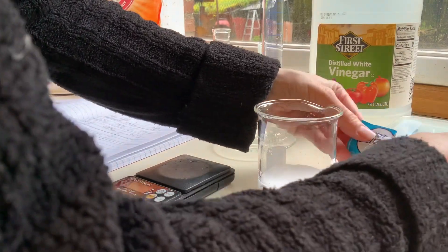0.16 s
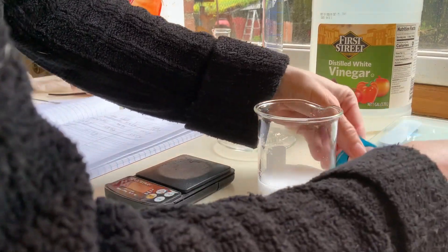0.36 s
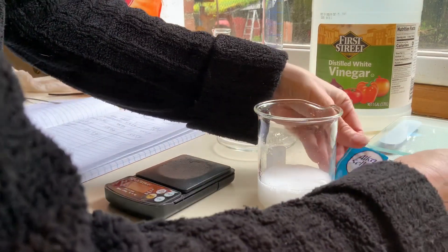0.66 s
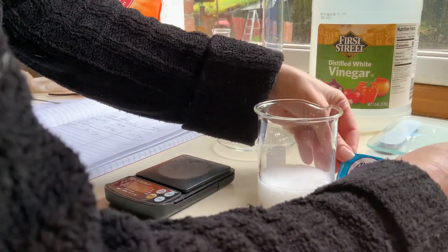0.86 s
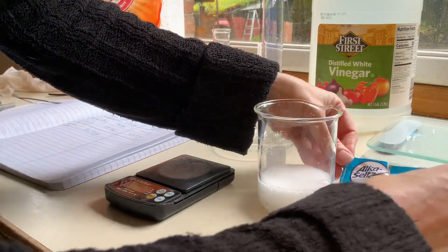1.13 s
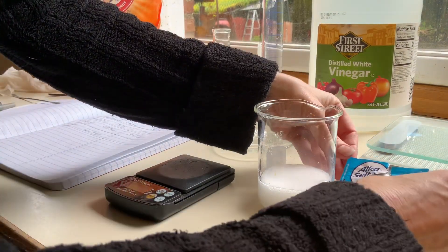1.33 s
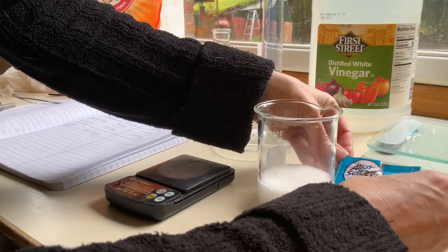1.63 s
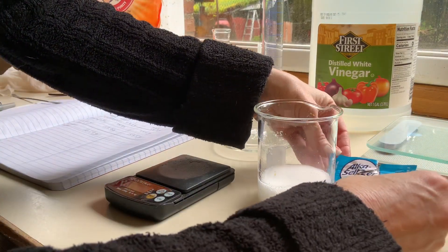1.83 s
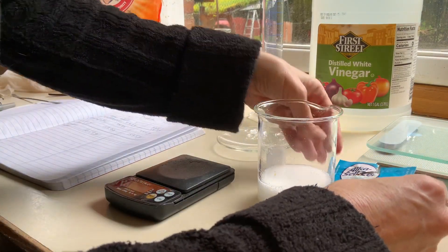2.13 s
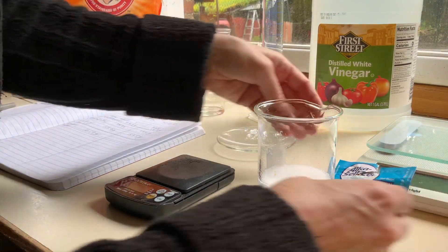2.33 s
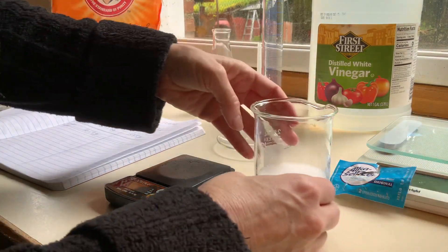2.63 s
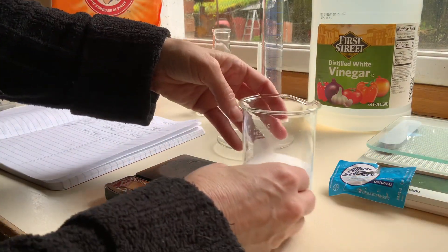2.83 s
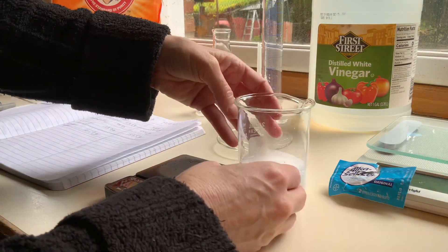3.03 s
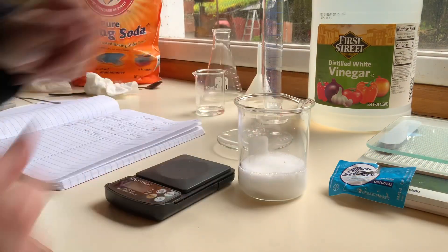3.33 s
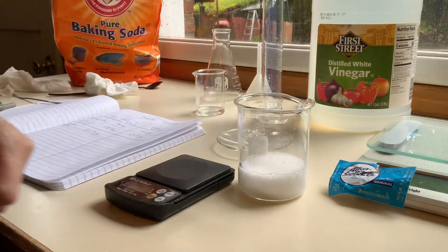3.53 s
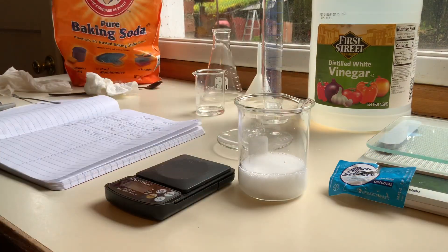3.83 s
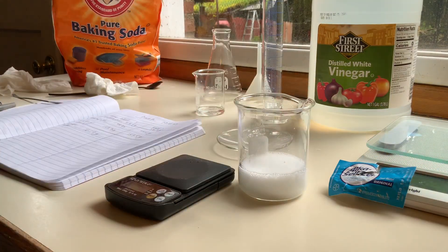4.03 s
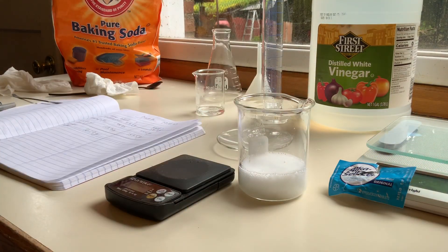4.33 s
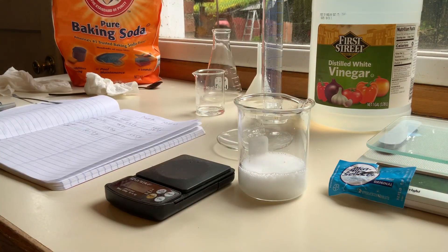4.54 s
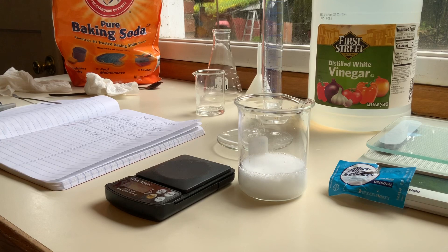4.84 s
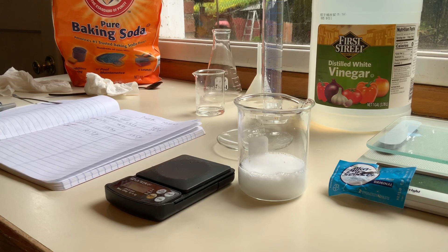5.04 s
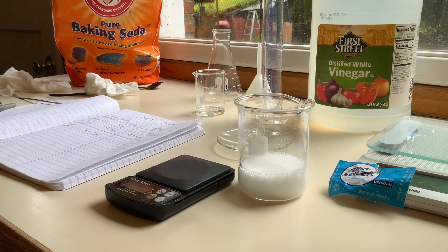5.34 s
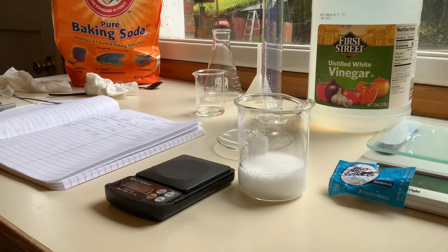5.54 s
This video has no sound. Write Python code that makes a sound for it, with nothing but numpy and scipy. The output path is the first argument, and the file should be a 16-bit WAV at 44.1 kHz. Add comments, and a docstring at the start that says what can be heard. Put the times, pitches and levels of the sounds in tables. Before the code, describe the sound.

Fine fizzing slowly fades over a low refrigerator hum, with foil crackles, a brief glass scrape on a worktop, then one sharp snap.

```python
"""In a quiet kitchen, something out of sight, probably a switch, snaps once: modes of a housing and a spring ring.
Before it a beaker of white liquid is slid a little way over the worktop: random slips make a dull scrape,
and catches ring the glass. A foil sachet crackles in bursts of resonant noise as it is laid down.
Throughout, random bubble bursts fizz finely and slowly die down, a refrigerator hums on lines of its motor
and the mains with wavering cabinet tones, and coloured noise makes a soft room rumble."""
import sys
import numpy as np
from scipy import signal
from scipy.fft import rfft, irfft
from scipy.io import wavfile

SR = 44100
rng = np.random.default_rng(int(sys.argv[2]) if len(sys.argv) > 2 else 0)


def log_audio(samples):
    """Write samples as a 16-bit WAV file to the path given in sys.argv[1]."""
    # one column per channel
    frames = np.atleast_2d(samples).T
    # limit to full scale, then quantise
    limited = np.clip(frames, -1, 1)
    pcm = np.round(limited * 32767).astype(np.int16)
    wavfile.write(sys.argv[1], SR, pcm)


N = 250929
TIME, FREQ = np.arange(N) / SR, np.fft.rfftfreq(N, 1 / SR)   # s, Hz
PORT_LAG_S = 0.00052   # delay of the right port

KNOCK_S = 4.4567   # the housing is struck once
# Modes of the hollow housing. Each row: frequency in Hz, level in dB before the body's band-pass,
# t60 in s, left-right difference in dB.
HOUSING_MODES = [(576, -25.5, 0.094, 19), (642, -17.5, 0.1, 5.5), (872, -24, 0.13, -2.5),
                 (910, -20, 0.031, 5), (1040, -28, 0.025, 4), (1550, -34, 0.044, 17), (2150, -49, 0.12, -4),
                 (2590, -41, 0.045, 4), (3300, -27.5, 0.039, -3)]
# Faint modes of the panel that carries the housing. Each row: frequency in Hz, level in dB, t60 in s,
# left-right difference in dB.
PANEL_MODES = [(205, -38.5, 0.22, 1), (343, -43, 0.26, -7), (575.7, -35.5, 0.46, 2), (635, -37, 0.34, 4),
               (1050, -37, 0.28, -7)]
# Modes of the spring. Each row: frequency in Hz, level in dB for a contact of 0 dB, t60 in s,
# left-right difference in dB.
SPRING_MODES = [(4296, -39, 0.045, 0), (4090, -32, 0.018, -1), (5830, -50, 0.09, -14),
                (6540, -43, 0.044, -14), (8565, -35, 0.07, 4), (12020, -53, 0.12, 0)]
# Contacts of the chattering spring. Each row: start in seconds, level in dB relative to the modes and ticks,
# highest pitch that the contact excites in Hz.
SPRING_CONTACTS = [(4.4563, 4.5, 4800), (4.4603, -2, 15000), (4.4659, -3, 12000), (4.4715, -6, 12000),
                   (4.4793, -13, 10000)]
# Spectra of the contact ticks, the rattling case, the merged spring overtones, the near reflections
# and the room's answer. Each row: frequency in Hz, relative density in dB per Hz.
TICK_SPECTRUM = [(2000, -20), (4000, 0), (9000, 0), (12000, -3), (16000, -6)]
RATTLE_SPECTRUM = [(700, -28), (1050, 5), (1500, 5), (2100, -1), (2700, -18), (3600, 3), (6000, -37)]
CLATTER_SPECTRUM = [(2500, -18), (4000, -5), (5000, 1), (6500, 0), (8000, -2), (10000, -32)]
SCATTER_SPECTRUM = [(100, 4), (200, 7.5), (400, 2), (600, 7), (1000, 3), (1600, 2), (2500, -12), (4200, -1),
                    (6000, -11), (9000, -6.5), (12000, -15.5), (16000, -32)]
ROOM_SPECTRUM = [(80, 3), (200, 9), (560, 2.5), (1000, 0.5), (1700, -10), (3000, -16), (8000, -34),
                 (15000, -52)]


def switch():
    """Modal excitation: a blow rings housing and panel, a spring chatters, the case rattles, reflections follow."""
    blow = [(KNOCK_S, 0, np.inf)]
    # a small housing radiates little bass, and the blow is slightly cushioned
    body = signal.butter(3, [450, 3600], "band", fs=SR, output="sos")
    knock = signal.sosfilt(body, struck(blow, HOUSING_MODES, PORT_LAG_S))
    panel = struck(blow, PANEL_MODES, PORT_LAG_S)
    spring = struck(SPRING_CONTACTS, SPRING_MODES, lag_s=0)

    tick_t60 = 0.018
    tick_envelope = sum(
        from_db(-37 + db) * passed(10000, limit_hz) * decay(start, tick_t60)
        for start, db, limit_hz in SPRING_CONTACTS)
    ticks = tick_envelope * diffuse(TICK_SPECTRUM, side_db=-11)

    first_bounce_s = SPRING_CONTACTS[1][0]
    rattle = from_db(-34) * decay(first_bounce_s, t60=0.022) * diffuse(RATTLE_SPECTRUM, side_db=11)
    # the spring's many close overtones merge into a bright clatter, louder on the right
    clatter_envelope = from_db(-34) * build_and_decay(KNOCK_S, t60=0.091, build_t60=tick_t60)
    clatter = place(clatter_envelope * noise(CLATTER_SPECTRUM), pan_db=-5, lag_s=PORT_LAG_S)

    # near surfaces build up over a few milliseconds, then the room takes over
    scatter_t60 = 0.13
    scatter_envelope = from_db(-25.5) * build_and_decay(KNOCK_S, scatter_t60, build_t60=0.054)
    scatter = scatter_envelope * diffuse(SCATTER_SPECTRUM, side_db=-18)
    room_envelope = from_db(-32) * build_and_decay(KNOCK_S, t60=0.34, build_t60=scatter_t60)
    room = room_envelope * diffuse(ROOM_SPECTRUM, side_db=0)
    return knock + panel + spring + ticks + rattle + clatter + scatter + room


def struck(contacts, modes, lag_s):
    """Superposition: every contact rings the modes below its soft limit, and each mode has its own pan."""
    total = 0
    for hz, db, t60, pan_db in modes:
        ringing = sum(
            from_db(force_db) * passed(hz, limit_hz) * ring(start, hz, t60)
            for start, force_db, limit_hz in contacts)
        total = total + place(from_db(db) * ringing, pan_db, lag_s)
    return total


def passed(hz, limit_hz):
    """Contact-time low-pass: a soft contact excites little above its limit."""
    return 1 / np.sqrt(1 + (hz / limit_hz) ** 6)


# Catches that make the beaker judder. Each row: start in seconds, level in dB, pitch in Hz,
# left-right difference in dB.
BEAKER_CATCHES = [(1.496, -45, 885, -2), (2.648, -45, 1020, -3), (2.7765, -36.5, 776, 6),
                  (2.779, -37, 775, 6), (2.807, -41, 770, 3), (2.819, -39, 785, 11), (2.857, -43, 1030, -5),
                  (2.931, -41, 820, 1)]
# Pushes of the beaker. Each row: time of the peak in seconds, force level in dB, length in seconds.
BEAKER_PUSHES = [(2.652, -57, 0.031), (2.748, -48, 0.051), (2.815, -46.5, 0.06), (2.864, -53, 0.042),
                 (2.938, -48.5, 0.031)]
# Spectra of the scrape and of its opposite-phase part from the sides.
# Each row: frequency in Hz, relative density in dB per Hz.
SCRAPE_SPECTRUM = [(200, -1), (480, -2), (640, 3.5), (780, 9.5), (880, -1), (1000, 7.5), (1150, -0.5),
                   (1500, -3), (1900, -4.5), (2200, -10), (2450, -18), (3000, -16), (4500, -16.5),
                   (9000, -66)]
SCRAPE_SIDE_SPECTRUM = [(300, -11), (520, 4), (650, -2), (1000, 8), (1300, -3), (1700, -19), (2150, -3),
                        (2400, -8), (2700, -2), (3300, -9), (4200, -29), (8000, -58)]
# Direction of the direct scrape. Each row: frequency in Hz, left-right difference in dB.
SCRAPE_PAN = [(300, 3), (600, 10.5), (800, 8), (1000, -4), (1900, -6)]
BEAKER_T60_S = 0.067   # of the first mode
OVERTONE_RATIO, OVERTONE_DB = 2.76, -21   # the glass's second mode, relative to the first


def beaker(slips_per_s=1500, grip_db=1.0):
    """Stick-slip friction: tiny random slips scrape; catches ring the glass at a pitch set by the grip."""
    slips = (rng.random(N) < slips_per_s / SR) * rng.standard_normal(N)
    # the grip of the glass comes and goes some tens of times a second
    grip = from_db(grip_db * noise([(30, 0), (60, 0), (150, -60)]))
    pushing = sum(
        from_db(db) * swell(peak, rise_s=length, fall_s=0.82 * length)
        for peak, db, length in BEAKER_PUSHES)
    force = pushing * rms_one(grip)
    scrape = aim(from_db(-2.5) * force * colour(slips, SCRAPE_SPECTRUM), SCRAPE_PAN, PORT_LAG_S)

    judder = 0
    for start, db, hz, pan_db in BEAKER_CATCHES:
        first_mode = ring(start, hz, BEAKER_T60_S)
        second_mode = from_db(OVERTONE_DB) * ring(start, OVERTONE_RATIO * hz, BEAKER_T60_S / 2)
        judder = judder + place(from_db(db) * (first_mode + second_mode), pan_db, PORT_LAG_S / 2)

    common = from_db(-5) * noise(SCRAPE_SPECTRUM)
    sides = from_db(-8) * apart(noise(SCRAPE_SIDE_SPECTRUM))
    return scrape + judder + force * (common + sides)


# Crackles of the sachet. Each row: start in seconds, level of the foil in dB, level of the fold in dB
# (both before the burst envelope), the fold's resonance in Hz, its width in Hz.
FOIL_CRACKLES = [(0.002, -41, -43, 4650, 900), (0.06, -49, -47, 4500, 1500),
                 (0.0745, -48, -42.5, 4200, 1800), (0.1705, -44, -36, 1900, 900),
                 (0.1746, -44.5, -49, 3930, 1800), (0.176, -49, -45.5, 1850, 900),
                 (0.228, -62, -44, 2870, 1500), (0.3494, -39, -40.5, 3260, 1000),
                 (0.5473, -49, -38.5, 3260, 1000), (0.5480, -59, -48, 1530, 700),
                 (2.118, -64, -44, 1540, 550), (2.1170, -63, -52, 3900, 1400)]
# Strokes of sachet and sleeve on the worktop. Each row: time of the peak in seconds, level there in dB.
WORKTOP_BRUSHES = [(0.004, -52.5), (0.59, -53.5)]
# Spectra of the foil and of the rubbing. Each row: frequency in Hz, relative density in dB per Hz.
FOIL_SPECTRUM = [(700, -8), (1400, 1), (2500, -7), (4500, 1), (8000, 5), (13000, 5), (16000, -8)]
RUB_SPECTRUM = [(1000, 11), (3000, 6), (5000, 13.5), (9500, 8), (15000, -1)]


def sachet():
    """Buckling: folds of foil snap in short uneven bursts that the worktop echoes; packet and sleeve rub softly."""
    # the buckling comes in tiny jerks, about one a millisecond
    jerks = rms_one(from_db(2 * noise([(300, 0), (1000, 0), (2000, -40)])))
    foil, white = diffuse(FOIL_SPECTRUM, side_db=-17), rng.standard_normal(N)
    crackles = 0
    for start, foil_db, fold_db, hz, width_hz in FOIL_CRACKLES:
        buckling = jerks * build_and_decay(start, t60=0.022, build_t60=0.0025)
        echo = from_db(-20) * decay(start, t60=0.1)
        burst = buckling + echo
        fold = from_db(fold_db) * burst * rms_one(resonate(white, hz, width_hz))
        # a fold is louder and earlier on the right
        crackles = crackles + from_db(foil_db) * burst * foil + place(fold, pan_db=-5, lag_s=-0.00019)
    brushing = sum(from_db(db) * swell(peak, rise_s=0.064, fall_s=0.032) for peak, db in WORKTOP_BRUSHES)
    return crackles + brushing * diffuse(RUB_SPECTRUM, side_db=-22)


# Spectra of the fizz in the open, past the arm that shields it, and in its opposite-phase side part.
# Each row: frequency in Hz, relative density in dB per Hz.
OPEN_SPECTRUM = [(2000, -29), (2700, -21.5), (3200, -9), (3700, -2.5), (4400, -0.5), (5200, -2.5),
                 (5800, -5), (7200, -4.5), (8800, -1), (10200, -3), (11200, -7.5), (13000, -5.5),
                 (15800, -16)]
SHIELDED_SPECTRUM = [(2000, -15), (2700, -19), (3100, -2), (3500, -3.5), (4200, -0.5), (4600, -7),
                     (5300, -5.5), (6200, 3), (8000, -2), (9400, 2), (11000, -1.5), (13000, -5),
                     (15800, -8)]
FIZZ_SIDE_SPECTRUM = [(3000, -22), (4000, -10), (4800, -3), (6000, 3.5), (7300, 9.5), (8000, -12),
                      (12000, -64), (15500, -4)]


def fizz(bubbles_per_s=30000, air_hz=5830, air_width_hz=330):
    """Shot noise: countless bubbles burst; an arm shades them, a hand held close strengthens one air resonance."""
    shielded = shielding()
    vigour = from_db(-0.8352 * TIME)   # the fizz fades by this many dB per second
    bursts = (rng.random((3, N)) < bubbles_per_s / SR) * rng.standard_normal((3, N))
    in_the_open = np.sqrt(1 - shielded) * colour(bursts[0], OPEN_SPECTRUM)
    past_the_arm = np.sqrt(shielded) * colour(bursts[1], SHIELDED_SPECTRUM)
    sides = from_db(-14.5) * apart(noise(FIZZ_SIDE_SPECTRUM))
    # full shielding would cost 3 dB
    hiss = from_db(-53.5 - 3 * shielded) * (in_the_open + past_the_arm + sides)

    air = rms_one(resonate_twice(bursts[2], air_hz, 2 * air_width_hz))
    open_air_gain = from_db(-66) * (1 - shielded)
    hand_air_gain = from_db(-61) * cupping()
    return vigour * (hiss + np.hypot(open_air_gain, hand_air_gain) * air)


def shielding(share=0.84, lift_s=2.2, lift_scale_s=0.46):
    """Acoustic shadow: the share of fizz that passes the arm falls along a smooth step as the arm lifts."""
    return share * (1 - np.tanh((TIME - lift_s) / (2 * lift_scale_s))) / 2


def cupping(arrives_s=0.85, attack_s=0.31, hold_s=0.46, release_s=2.3):
    """Envelope of the cupped hand's closeness, 0-1: linear attack, hold, exponential release."""
    since = TIME - arrives_s
    release = np.exp(-np.maximum(since - attack_s - hold_s, 0) / release_s)
    return np.clip(since / attack_s, 0, 1) * release


# Sharp resonances of the beaker that the fizz keeps sounding. Each row: frequency in Hz,
# half the width of each of two cascaded resonators in Hz, unshielded level in dB.
BEAKER_WHISTLES = [(4264, 61, -73.5), (5676, 64, -70.5)]


def whistles():
    """Driven resonance: noise sings faintly in the open beaker, less so while the arm shields it."""
    white = rng.standard_normal(N)
    singing = sum(
        from_db(db) * rms_one(resonate_twice(white, hz, 2 * half_width_hz))
        for hz, half_width_hz, db in BEAKER_WHISTLES)
    return (1 - shielding()) * singing


# Lines of the compressor motor. Each row: multiple of the shaft rate, level at the start in dB,
# left-right difference in dB.
MOTOR_LINES = [(1, -46.5, 0), (2, -58.5, 1), (3, -77, 0), (4, -55, 4.5), (8, -65, 14)]
# Magnetic hum. Each row: multiple of the mains rate, level in dB, left-right difference in dB.
MAINS_LINES = [(2, -54, 0), (4, -68, 0)]
# Wavering tones of the cabinet. Each row: frequency in Hz, width in Hz, level in dB,
# left-right difference in dB.
CABINET_TONES = [(381.8, 3.9, -62.5, -2), (416, 3.2, -68, 2), (514, 1.9, -69, -1), (541.7, 3.3, -63.5, 6),
                 (716, 3.8, -73, 8.5), (762, 1.7, -72, 3), (805, 2.7, -75, 12)]
SHAFT_HZ, MAINS_HZ = 58.905, 60.0


def refrigerator():
    """Beating: the motor slips just behind the mains, so near lines beat; narrow noise makes the cabinet waver."""
    easing = from_db(-0.42 * TIME)   # the motor's hum eases by this many dB per second
    motor = easing * hum(SHAFT_HZ, MOTOR_LINES)
    cabinet = 0
    for hz, width_hz, db, pan_db in CABINET_TONES:
        tone = rms_one(resonate(rng.standard_normal(N), hz, width_hz))
        cabinet = cabinet + place(from_db(db) * tone, pan_db, lag_s=0.00042)
    return motor + hum(MAINS_HZ, MAINS_LINES) + cabinet


def hum(base_hz, lines, in_step_s=0.42):
    """Harmonic series: steady sines on multiples of one rate, all in step at one swell of the beat."""
    return sum(
        place(from_db(db) * np.sqrt(2) * np.sin(2 * np.pi * k * base_hz * (TIME - in_step_s)), pan_db)
        for k, db, pan_db in lines)


# Room rumble, shared by both ears and differing between them.
# Each row: frequency in Hz, relative density in dB per Hz.
RUMBLE_SPECTRUM = [(25, -16), (48, -14), (68, 1), (100, -0.5), (150, -7.5), (300, -5.5), (430, -3.5),
                   (510, -9.5), (565, -18), (625, -10), (690, -20), (900, -17.5), (1100, -19.5),
                   (1600, -24.5), (2150, -30.5), (2600, -41), (4000, -67)]
RUMBLE_SIDE_SPECTRUM = [(40, -23), (100, -13.5), (200, -7), (260, -2), (335, -5.5), (450, 0), (600, -6),
                        (950, -7), (1300, -18.5), (2000, -24), (2600, -17.5), (3100, -15), (4000, -30.5),
                        (5000, -84)]


def background():
    """Ambient noise: low rumble of the room, part in phase and part in opposite phase at the ports."""
    return from_db(-51.5) * noise(RUMBLE_SPECTRUM) + from_db(-55.5) * apart(noise(RUMBLE_SIDE_SPECTRUM))


def from_db(db):
    """Logarithmic level: decibels to gain."""
    return 10 ** (np.asarray(db) / 20)


def rms_one(x):
    """Normalisation to unit power."""
    return x / np.sqrt(np.mean(x ** 2) + 1e-20)


def colour(x, spectrum):
    """Spectral shaping: weight a signal by levels interpolated over log frequency; rms 1."""
    hz, db = np.transpose(spectrum)
    gain = from_db(np.interp(np.log(FREQ + 1), np.log(hz), db))
    return rms_one(irfft(rfft(x) * gain, N))


def noise(spectrum):
    """Coloured noise: fresh Gaussian noise with a spectrum; rms 1."""
    return colour(rng.standard_normal(N), spectrum)


def resonate(x, hz, width_hz):
    """Second-order resonance with a gain near 1 at its peak."""
    r = np.exp(-np.pi * width_hz / SR)
    zeros = np.array([1, 0, -1]) * (1 - r * r) / 2
    poles = [1, -2 * r * np.cos(2 * np.pi * hz / SR), r * r]
    return signal.lfilter(zeros, poles, x)


def resonate_twice(x, hz, width_hz):
    """Cascaded resonance: two equal stages give steeper skirts."""
    return resonate(resonate(x, hz, width_hz), hz, width_hz)


def decay(start, t60):
    """Exponential decay: a sudden onset that falls 60 dB in t60 seconds."""
    return (TIME >= start) * from_db(-60 * np.clip((TIME - start) / t60, 0, 3))


def build_and_decay(start, t60, build_t60):
    """Difference of two exponentials: a quick build-up, then a decay."""
    return decay(start, t60) - decay(start, build_t60)


def ring(start, hz, t60):
    """Free vibration: one damped mode set ringing at one moment."""
    return decay(start, t60) * np.sin(2 * np.pi * hz * (TIME - start))


def swell(peak_s, rise_s, fall_s):
    """Exponential envelope of a hand's stroke: it builds up to a peak and ebbs."""
    return np.exp(-np.abs(TIME - peak_s) / np.where(TIME < peak_s, rise_s, fall_s))


def place(x, pan_db, lag_s=0):
    """Level and time difference: a positive pan favours the left port, a positive lag delays the right."""
    delayed = np.interp(TIME - lag_s, TIME, x)
    return np.array([x * from_db(pan_db / 2), delayed * from_db(-pan_db / 2)])


def aim(x, pans, lag_s):
    """Directivity: like place, for a source that radiates each pitch in a direction of its own."""
    hz, db = np.transpose(pans)
    lean = from_db(np.interp(np.log(FREQ + 1), np.log(hz), db) / 2)
    spectrum = rfft(x)
    delay = np.exp(-2j * np.pi * FREQ * lag_s)
    return irfft([spectrum * lean, spectrum / lean * delay], N)


def apart(x):
    """Antiphase: the same sound with opposite sign at the two ports."""
    return np.array([x, -x])


def diffuse(spectrum, side_db):
    """Diffuse field: noise arriving from all round; long waves reach both ports alike."""
    band = signal.butter(1, [350, 6000], "band", fs=SR, output="sos")
    side = signal.sosfilt(band, noise(spectrum))
    return noise(spectrum) + from_db(side_db) * apart(side)


def scene():
    """Superposition of all sources at the two ports."""
    return refrigerator() + background() + fizz() + whistles() + sachet() + beaker() + switch()


def record(dry):
    """Band limiting: cut the deep bass and, steeply, the top; a mirrored lead-in settles the filters."""
    running = np.pad(dry, ((0, 0), (SR, 0)), "reflect")
    high_pass = signal.butter(4, 40, "high", fs=SR, output="sos")
    low_pass = signal.ellip(12, 0.1, 80, 15800, fs=SR, output="sos")
    thinned = signal.sosfilt(high_pass, running)
    return signal.sosfilt(low_pass, thinned)[:, SR:]


dry = scene()
out = record(dry)
log_audio(out)
```